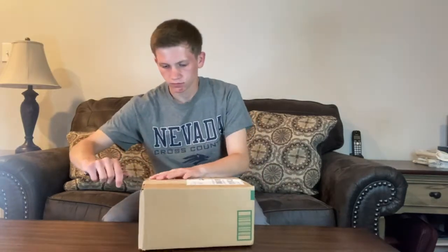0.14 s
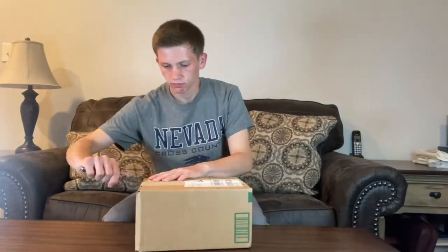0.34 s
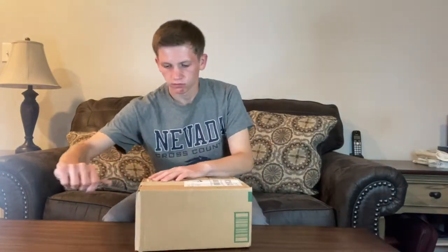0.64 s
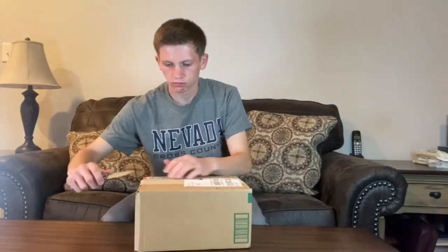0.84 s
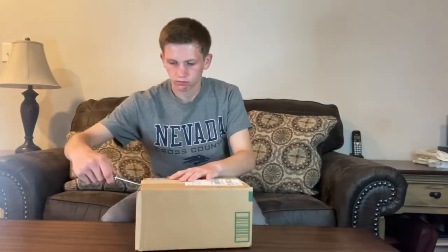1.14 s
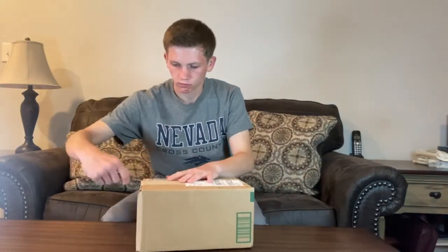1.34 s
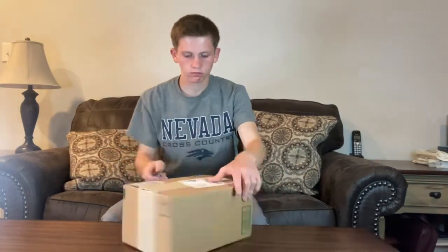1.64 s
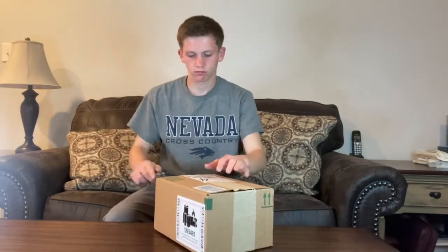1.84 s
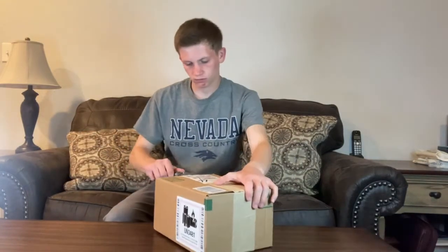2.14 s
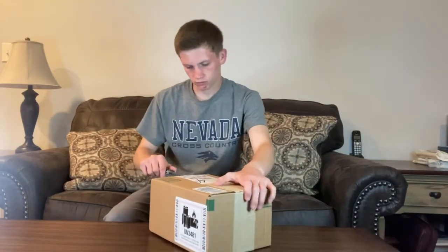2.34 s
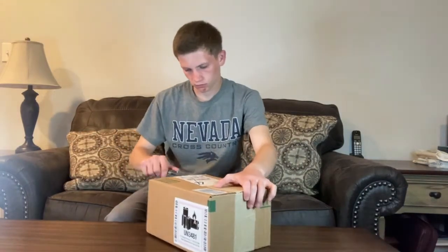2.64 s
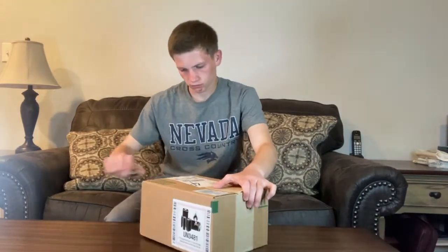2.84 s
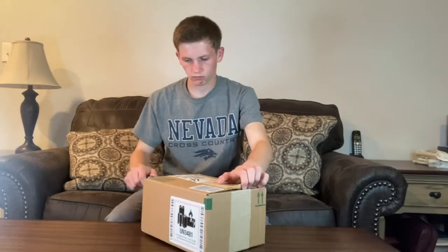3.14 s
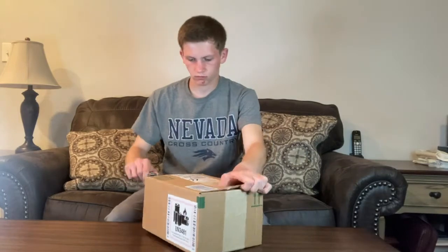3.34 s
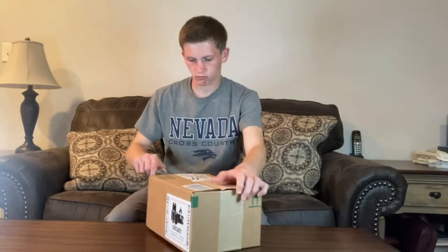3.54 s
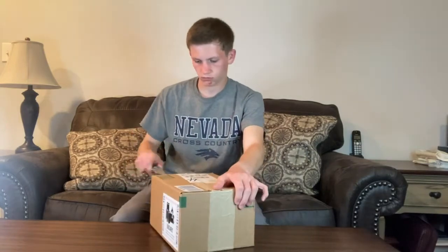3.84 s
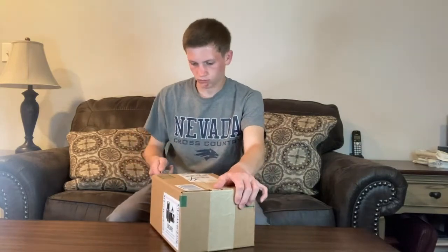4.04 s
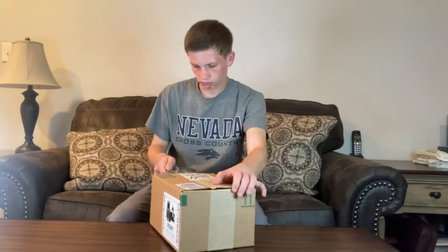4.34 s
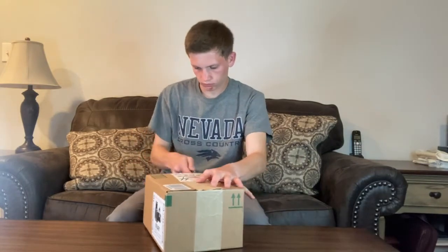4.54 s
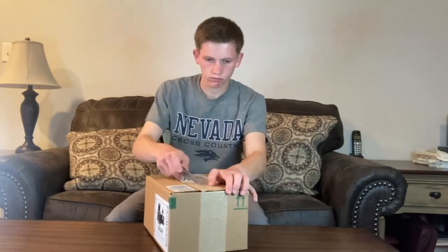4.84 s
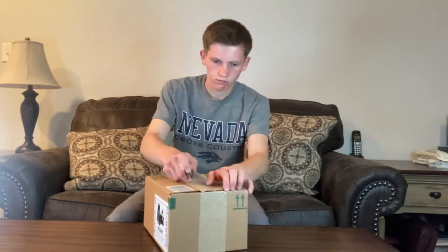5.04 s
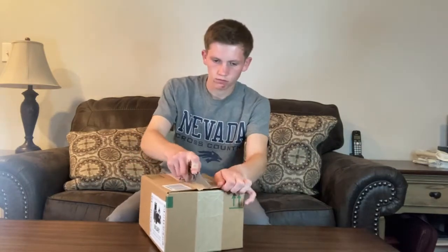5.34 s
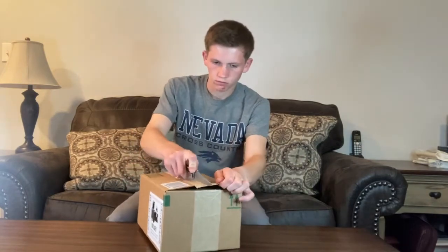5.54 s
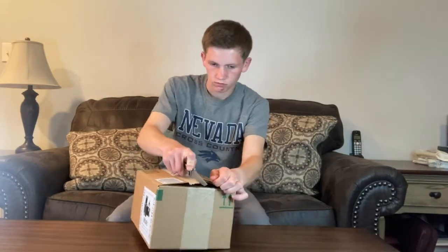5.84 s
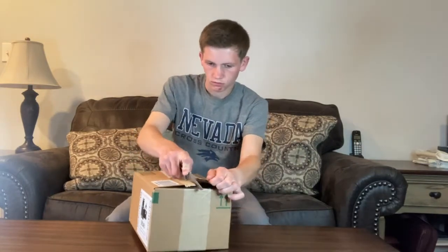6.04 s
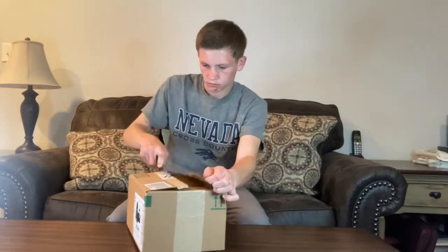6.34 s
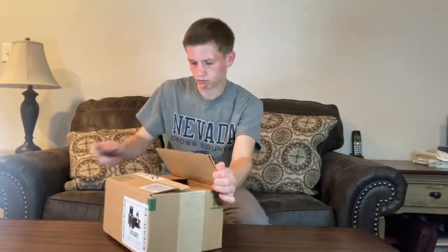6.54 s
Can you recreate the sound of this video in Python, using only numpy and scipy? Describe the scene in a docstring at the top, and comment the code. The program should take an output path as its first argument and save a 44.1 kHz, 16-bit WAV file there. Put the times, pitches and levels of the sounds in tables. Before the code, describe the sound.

Close, dry cardboard rubbing and clicking as packing tape is cut, with boxy knocks, low table thumps and a single bursting pop.

```python
"""Knife through packing tape

A knife slits packing tape on a cardboard box that stands on a wooden table in a furnished room.
Blade and hands rub the board (patchy noise and ticks), the tape lets go in sharp snaps (clicks that ring
the box), the flaps jolt (rough force through box resonances), and the table murmurs and thuds (low noise).
Once the taut end strip bursts with a crack and the table hums; echoes and a faint hush are the room.
Two close microphone ports hear it, the left one a moment earlier."""
import sys
import numpy as np
from scipy import signal
from scipy.fft import rfft, irfft, next_fast_len
from scipy.io import wavfile
from scipy.ndimage import uniform_filter1d, map_coordinates

SR = 44100
rng = np.random.default_rng(int(sys.argv[2]) if len(sys.argv) > 2 else 0)


def put_to_file(sound):
    """Save the sound as 16-bit audio at rate SR, in the file named by the first command-line argument."""
    columns = np.atleast_2d(sound).T  # one column per channel
    safe = np.clip(columns, -1, 1)
    whole_steps = np.round(safe * 32767)
    wavfile.write(sys.argv[1], SR, whole_steps.astype(np.int16))


N = 294928

# Resonances of the cardboard box. Each row: centre in Hz, width in Hz, relative level in dB.
BOX_MODES = [(192, 38, -7.5), (318, 158, 2), (546, 340, 2.5), (778, 305, 3), (1060, 110, 0.5),
             (1340, 247, -5), (2330, 200, -11), (2510, 370, -12)]
# Colour of the hiss at the rubbed surface. Each row: frequency in Hz, relative level in dB per Hz.
HISS_COLOUR = [(880, -35), (1500, -7), (1740, -7.5), (2690, -3.5), (2970, -1.5), (3180, -4.5), (3730, -6),
               (4370, -7), (7610, -12.5), (9010, -12.5), (11500, -17), (15100, -20.5), (16000, -22)]
# Colour of a tick or snap. Each row: frequency in Hz, relative level in dB per Hz.
CRACK_COLOUR = [(700, -30), (1500, -11), (2700, -5), (4000, -6.5), (6000, -4.5), (9500, -5.5), (12000, -17),
                (15000, -8), (16000, -10)]
# How alike rubbing and table sound at the two ports. Each row: frequency in Hz, likeness (1 = same).
PORT_LIKENESS = [(100, 0.97), (1000, 0.85), (4000, 0.17), (12000, 0.2)]


def amp(db):
    """dB to gain."""
    return 10 ** (np.asarray(db) / 20)


def unit(x):
    """Scaled to rms 1."""
    return x / np.sqrt(np.mean(x ** 2) + 1e-20)


def peak_one(x):
    """Each row scaled to peak 1."""
    return x / np.abs(x).max(axis=1, keepdims=True)


def along(points, hz):
    """Reads (Hz, value) points on a logarithmic frequency axis."""
    f, v = np.transpose(points)
    return np.interp(np.log(hz + 1), np.log(f + 1), v)


def curves(rows):
    """One value per sample for each column after the time."""
    s, *cols = np.transpose(rows)
    return [np.interp(np.arange(N) / SR, s, c) for c in cols]


def wobble(rate):
    """A smooth random curve with rate knots a second."""
    knots = rng.standard_normal(int(N * rate / SR) + 4)
    return map_coordinates(knots, [np.arange(N) * rate / SR])


def filtered(x, response):
    """Filters x by a complex response of frequency."""
    n = x.shape[-1]
    m = next_fast_len(n + 8192)  # silence for the ringing to run into
    return irfft(rfft(x, m) * response(np.fft.rfftfreq(m, 1 / SR)), m)[..., :n]


def resonances(modes):
    """Causal response of (Hz, width Hz, dB) modes, added with alternating sign."""
    def response(f):
        total = 0
        for k, (centre, width, db) in enumerate(modes):
            damping = 1j * f * width
            total = total + (-1) ** k * amp(db) * damping / (centre * centre - f * f + damping)
        return total
    return response


def favour(centre_hz, width, rest):
    """One broad resonance of relative width over a flat rest."""
    def response(hz):
        damping = 1j * hz * width * centre_hz
        return rest + damping / (centre_hz ** 2 - hz ** 2 + damping)
    return response


def causal(db_of):
    """Minimum-phase response with the given dB over frequency."""
    def response(f):
        cepstrum = irfft(np.log(amp(db_of(f)) + 1e-6))
        half = len(cepstrum) // 2
        cepstrum[1:half] *= 2  # fold the part before time zero onto the part after
        cepstrum[half + 1:] = 0
        return np.exp(rfft(cepstrum))
    return response


def pair(response, likeness):
    """Stereo noise of rms 1 whose two sides are partly alike."""
    def mid_and_side(hz):
        turn = np.arccos(np.clip(along(likeness, hz), -1, 1)) / 2
        return response(hz) * [np.cos(turn), np.sin(turn)]
    mid, side = filtered(rng.standard_normal((2, N)), mid_and_side)
    return unit(np.array([mid + side, mid - side]))


def patchy(x, depth_db):
    """Random patches of gain over time and frequency: the colour of a rubbed surface keeps shifting."""
    z = signal.stft(x, nperseg=256)[2]
    field = uniform_filter1d(rng.standard_normal(z.shape[1:]), size=4, axis=0)  # over frequency
    field = uniform_filter1d(field, size=9, axis=1)  # over time
    return unit(signal.istft(z * amp(depth_db * unit(field)), nperseg=256)[1][:, :N])


def summed(db, rest_db, t):
    """Rows of dB at times t, added by power over a resting level, as one gain per sample."""
    gain = np.sqrt((amp(db) ** 2).sum(axis=0) + amp(rest_db) ** 2)
    return np.interp(np.arange(N) / SR, t, gain)


def place(bursts, times):
    """Adds each burst into one track at its time."""
    track = np.zeros(N + bursts.shape[1])
    for s, burst in zip(times, bursts):
        track[round(s * SR):][:len(burst)] += burst
    return track[:N]


def strokes():
    """Gains of board, dull and bright hiss: a stroke sets in, swells or sinks, and dies away."""
    # Strokes of blade, hands and box. Each row: start in seconds, length in seconds, board level in dB,
    # surface hiss level in dB, swell from start to end in dB, bright over dull hiss in dB.
    stroke_rows = [(0, 0.011, -60.5, -67.5, -1.5, -1), (0.03, 0.068, -56, -68, -1.5, 2.5),
                   (0.123, .025, -57, -61, 1, -4), (0.193, 0.17, -55.5, -58.5, 5, 0),
                   (0.362, 0.062, -56, -61, -20.5, 19.5), (0.455, 0.021, -54, -47, -4, 1),
                   (0.568, .04, -46, -48, 16, -7), (0.609, 0.017, -48, -47, -9, 7),
                   (0.657, 0.038, -49.5, -55, 9.5, -2), (0.761, 0.096, -64, -72, 9, -1),
                   (1.05, 0.045, -52.5, -56, -17.5, -4.5), (1.101, 0.081, -58.5, -76, -8, -11),
                   (1.212, 0.048, -54.5, -69, 8.5, -7), (1.291, 0.068, -46, -51.5, -3.5, 1.5),
                   (1.339, 0.1262, -54, -60.5, 9, -1.5), (1.504, 0.053, -64.5, -71, 10.5, 7.5),
                   (1.605, 0.1, -55, -50, 4, 4), (1.739, .1, -54.5, -56.5, -2.5, 1),
                   (2.013, 0.024, -53, -68.5, -13, 7), (2.06, 0.075, -84, -89, -7, 11),
                   (2.17, 0.12, -71.5, -71, 12, 6.5), (2.32, 0.036, -55, -65, 8.5, 1),
                   (2.467, 0.088, -64.5, -85, 0.5, -27), (2.565, 0.073, -50.5, -59, -0.5, 3),
                   (2.668, 0.053, -48, -50, 0, -4), (2.743, .04, -53, -61.5, 5, -3.5),
                   (2.841, 0.024, -40, -40, 8, -6), (2.872, 0.053, -46, -53, -17, 1.5),
                   (2.959, .12, -57.5, -56.5, 5, 1), (3.129, .11, -60.5, -65.5, 4.5, -4.5),
                   (3.247, 0.11, -53.5, -59, -2.5, -1), (3.35, .07, -54.5, -53, 7.5, 3),
                   (3.431, .1, -52, -45.5, -14, -5.5), (3.537, .05, -55, -55.5, -1.5, -1),
                   (3.593, 0.027, -51.5, -52, 2, 1.5), (3.642, 0.098, -57, -58.5, -14, -1.5),
                   (3.758, 0.087, -57, -60.5, 1, 3), (3.955, 0.015, -80.5, -77.5, -2, 3.5),
                   (4.072, 0.23, -77.5, -101.5, 15, 2.5), (4.322, 0.037, -66.5, -61.5, -10, -3),
                   (4.356, 0.069, -56, -51.5, 5, 5.5), (4.456, 0.036, -40.5, -48, 9.5, -7),
                   (4.498, 0.091, -52.5, -54.5, -5.5, -3.5), (4.621, 0.051, -40, -50, 14, -8.5),
                   (4.669, 0.07, -72.5, -62, -11, -7.5), (4.801, .13, -64, -71.5, 5, 6.5),
                   (4.966, .09, -63.5, -64.5, -3, -3), (5.092, 0.11, -60.5, -62, -12, 0.5),
                   (5.205, 0.18, -59.5, -66, -16, 2.5), (5.459, 0.041, -65, -65, 11.5, -2.5),
                   (5.595, 0.019, -74, -72.5, 1, -9), (5.719, 0.058, -70.5, -69, 9, 2),
                   (5.628, 0.034, -82, -75, -5, -4), (5.78, 0.051, -73.5, -70.5, -6, -4),
                   (5.858, 0.22, -72.5, -72.5, -7, -3.5), (6.037, .05, -55, -57.5, -11, 8),
                   (6.111, 0.085, -60.5, -59.5, -7, -4), (6.224, 0.11, -58, -64.5, 8, -4),
                   (6.365, 0.079, -53.5, -61, -7.5, -6), (6.496, 0.084, -79.5, -79, -8, 4.5)]
    attack_db_per_s, release_db_per_s = 1299, 298.5
    rest_board_db, rest_dull_db, rest_bright_db = -87, -88.5, -88  # hands lying still on the box
    s, length, board_db, hiss_db, swell_db, bright_db = np.transpose(stroke_rows)[..., None]
    t = np.arange(0, N / SR, .001)
    shape_db = swell_db * (np.clip((t - s) / length, 0, 1) - .5)
    shape_db -= attack_db_per_s * np.maximum(s - t, 0)
    shape_db -= release_db_per_s * np.maximum(t - s - length, 0)
    board = summed(board_db + shape_db, rest_board_db, t)
    dull = summed(hiss_db - bright_db / 2 + shape_db, rest_dull_db, t)
    bright = summed(hiss_db + bright_db / 2 + shape_db, rest_bright_db, t)
    return board, dull, bright


def fibres(rate, spread_db):
    """Single fibres break at random: sparse impulses, rate a second, of very unequal size, rms 1."""
    chance, size = rng.random(N), rng.exponential(size=N)
    sign = rng.choice([-1, 1], N)
    return unit((chance < rate / SR) * amp(spread_db * np.minimum(size, 4)) * sign)


def rubbing():
    """Uneven friction: fibres catch in clumps, hiss at the surface and shake the box."""
    pressure, dull, bright = strokes()
    grip = wobble(35)
    catches = unit(amp(1.3 * grip + 0.32 * wobble(250)))
    shaken = patchy(pair(resonances(BOX_MODES), PORT_LIKENESS), depth_db=4)
    board = pressure * amp(0.59 * grip) * shaken
    breaks = fibres(600, spread_db=4.0)  # each tick at the surface also taps the box
    ticks = amp(-7.5) * unit(filtered(breaks, causal(lambda hz: along(CRACK_COLOUR, hz))))
    friction = patchy(pair(lambda hz: amp(along(HISS_COLOUR, hz)), PORT_LIKENESS), depth_db=3)
    surface = catches * friction + ticks
    rasp = filtered(surface, lambda hz: 1 / (1 + (hz / 5200) ** 4))  # the dull part
    hiss = dull * rasp + bright * (surface - rasp)
    taps = pressure * amp(-7.5) * unit(filtered(breaks, resonances(BOX_MODES)))
    return board + hiss + taps


def table_top():
    """The table murmurs under the handling and booms briefly at each bump: noise through its modes."""
    # Resonances of the table top. Each row: centre in Hz, width in Hz, relative level in dB.
    table_modes = [(113, 18, -2.5), (178, 60, -10)]
    # The box bumps the table top. Each row: time in seconds, level in dB before the wobble.
    thud_rows = [(.17, -67), (.345, -50), (.455, -58), (0.602, -48), (.68, -53), (1.05, -58), (1.298, -44),
                 (1.39, -58), (1.46, -45.5), (1.581, -41.5), (1.845, -55), (2.005, -46), (2.36, -61),
                 (2.585, -65), (2.68, -51), (2.8, -55), (2.86, -48), (2.95, -69.5), (3.599, -48.5),
                 (4.49, -51), (4.66, -49), (4.87, -61), (5.154, -54.5)]
    # The low murmur. Each row: time in seconds, level in dB before the wobble.
    murmur_rows = [(0, -63), (1, -71), (1.5, -68), (2.15, -69), (3.3, -64.5), (3.95, -66.5), (4.1, -67.5),
                   (4.4, -68), (5.05, -71), (5.38, -60.5), (5.56, -87), (5.87, -82.5), (5.94, -72),
                   (6.01, -81), (6.06, -72), (6.4, -65.5), (6.62, -87)]
    rise_s, fall_s = 0.0105, 0.45  # each over 60 dB
    s, db = np.transpose(thud_rows)[..., None]
    t = np.arange(0, N / SR, .001)
    bumps = summed(db - 60 * np.maximum((s - t) / rise_s, (t - s) / fall_s), -120, t)
    level = np.hypot(bumps, amp(curves(murmur_rows)[0]))
    return level * amp(3.2 * wobble(26)) * pair(resonances(table_modes), PORT_LIKENESS)


def room_tone():
    """A faint steady hush, coloured noise that sinks towards the end."""
    # Colour of the hush. Each row: frequency in Hz, relative level in dB per Hz.
    air_colour = [(18, -49), (30, -34), (112, 1), (336, -3), (962, -6.5), (1960, -15), (2980, -25),
                  (8520, -22), (12000, -28), (13500, -41.5), (16000, -44.5)]
    # Level of the hush. Each row: time in seconds, level in dB.
    air_level = [(0, -76), (5.3, -80), (6.4, -86), (6.69, -88)]
    hush = pair(lambda hz: amp(along(air_colour, hz)), [(100, 0.42), (3000, .4)])
    return amp(curves(air_level)[0]) * hush


def room(x):
    """Each frequency of the room's answer dies at its own speed; every stretch of sound meets a new tail."""
    # Decay of the room. Each row: frequency in Hz, time to fall by 60 dB in seconds.
    decay_rows = [(150, 0.17), (800, 0.2), (3000, 0.094), (12000, 0.15)]
    # How alike the echoes are at the two ports. Each row: frequency in Hz, likeness (1 = same).
    echo_likeness = [(100, 0.83), (1000, 0.11), (4000, 0.45), (12000, 0.1)]
    step = SR // 4
    delay = 130  # samples until the first echo
    wet = np.zeros((2, N + SR + step))
    for start in range(0, N, step):
        hz, t, (mid, side) = signal.stft(rng.standard_normal((2, SR // 3)), SR, nperseg=256)
        turn = np.arccos(np.clip(along(echo_likeness, hz), -1, 1))[:, None] / 2
        z = np.cos(turn) * mid + np.array([[[1]], [[-1]]]) * np.sin(turn) * side
        decay = amp(-60 * t / along(decay_rows, hz)[:, None])
        tail = signal.istft(z * decay, SR, nperseg=256)[1]
        tail = tail / np.linalg.norm(tail[0])
        echo = signal.fftconvolve(x[None, start:start + step], tail, axes=1)
        wet[:, start + delay:][:, :echo.shape[1]] += echo
    return wet[:, :N]


def snaps():
    """The glue starts to crackle and lets go a moment later: a click, and a push that rings the box."""
    # Tape snaps and blade ticks. Each row: start in seconds, peak of the click in dB, push on the board
    # in dB against the click, favoured pitch in Hz, tilt in dB per octave of (Hz + 1000), held within 20.
    snap_rows = [(.087, -50, -5, 2700, -5), (0.2979, -34.5, -19, 2710, -5), (0.3402, -35.5, -3, 2500, -10),
                 (0.4482, -40, 0, 2560, -8), (0.4689, -29.5, -15.5, 2540, -18),
                 (0.5712, -35, -11, 2470, -11), (0.5927, -27.5, -12, 2470, -12),
                 (0.6426, -35, -10.5, 2700, -21), (0.6816, -25.5, -1, 3600, -9), (1.035, -39, -4, 2480, 2),
                 (1.1291, -40.5, 0, 2380, -26), (1.2944, -35, -7, 2740, -15), (1.527, -42, -7, 3900, -0.5),
                 (1.5738, -47, 1, 2900, -8), (1.711, -30, 2, 3050, -7), (1.843, -27, -14, 3030, 3.5),
                 (1.858, -43.5, -18, 7950, 5), (1.9981, -44, 4, 2920, -1), (2.0585, -55, 13, 3030, -14),
                 (2.178, -52, -26, 8000, 3), (2.3588, -38, -16, 3300, -22), (2.371, -47.5, -20, 8000, 1),
                 (2.465, -51.5, 7.5, 3070, -25), (2.556, -52, -20, 7940, 1), (2.5919, -39.5, -6, 2580, -23),
                 (2.7767, -31.5, -17.5, 2800, 7.5), (3.028, -32, -28, 3010, 3.5),
                 (3.1108, -36, 5, 2370, -12), (3.163, -31.5, -6.5, 3064, 5), (3.3543, -40, -3.5, 3020, -4),
                 (3.3999, -20.5, -22.5, 6690, -3.5), (3.417, -49, -15.5, 2560, -5.5),
                 (3.4259, -33, -1.5, 3450.0, 0), (3.5559, -42, -11.5, 8540, 2),
                 (3.754, -37, -23, 8020, -11.5), (3.9352, -58.5, -3.5, 7290, 5),
                 (3.9669, -38, -24.5, 7830, -5.5), (4.02, -67.5, 17.5, 2910, -1),
                 (4.448, -38, -22, 3150, -7), (4.6604, -24.5, 1, 3240, -6.5), (4.824, -52, -16.5, 9500, -1),
                 (4.8658, -54, 16.5, 2020.0, 12), (4.9761, -43, -1, 2430, -1.5),
                 (4.9888, -40.5, -18, 6100, 7.5), (5.0886, -41, -27, 6720.0, 11),
                 (5.1522, -42.5, 13, 2930, -26), (5.223, -42.5, -19, 6800, -4),
                 (5.3046, -48.5, -1, 2650, -23), (5.3498, -45.5, -21, 4020, 3),
                 (5.466, -53.5, -20, 8020, -2), (5.49, -52, -19, 7500, 2), (5.6012, -48, -18, 7550, -0.5),
                 (5.689, -64.5, -3, 4010, -7), (5.7568, -39, -28, 3750, -0.5), (5.9158, -46.5, -3, 6640, 1),
                 (5.9633, -50, -7, 3830, 3), (6.0177, -45.5, 1, 3720, 0), (6.0443, -32, -8, 3640, 2.5),
                 (6.1095, -34.5, -29, 2380, 1), (6.255, -48, -16, 2330, -18), (6.3813, -37.5, 3, 3300, 2.5)]
    s, db, push_db, spot_hz, tilt_db = np.transpose(snap_rows)[..., None]
    t = np.arange(SR // 10) / SR
    release = np.arange(len(t)) == round(.0012 * SR)
    crackle = release + 0.19 * rng.standard_normal((len(s), len(t))) * amp(-60 * t / 0.029)
    colour = causal(lambda hz: along(CRACK_COLOUR, hz))
    spot, broad = favour(spot_hz, .07, 0.74), favour(spot_hz, .6, 0.46)
    lean = lambda hz: amp(np.clip(tilt_db, -20, 20) * np.log2((hz + 1000) / 5000))
    click = peak_one(filtered(crackle, lambda hz: colour(hz) * spot(hz) * broad(hz) * lean(hz)))
    box = resonances(BOX_MODES)
    push = peak_one(filtered(1. * release, lambda hz: box(hz) / (1 + 1j * hz / 1200))[None])
    return place(amp(db) * (click + amp(push_db) * push), s[:, 0])


def jolts():
    """A short rough force swells and dies in the board; each spot favours the box modes near its own pitch."""
    # The blade slips or a flap gives. Each row: start in seconds, peak of the board in dB, favoured
    # pitch in Hz, hiss in dB against the board, time for the force to fall by 60 dB in seconds.
    jolt_rows = [(0.18, -44.5, 390, -10, 0.058), (0.239, -45, 400, -15, 0.048), (.284, -44, 800, 2, 0.095),
                 (.341, -35, 354, -24, 0.045), (0.36, -34.5, 320, -7, 0.03), (.451, -24, 360, -8, 0.095),
                 (0.467, -26.5, 373, -15.5, 0.04), (0.568, -34.5, 270, -29, 0.021),
                 (0.592, -31, 362, -6, 0.097), (.61, -29, 330, -9, 0.056), (.621, -25, 330, -28, 0.015),
                 (.678, -29.5, 624, -2, 0.047), (.859, -49, 554, 8, 0.051), (1.038, -40, 664, -2, 0.11),
                 (1.056, -30, 526, -15, 0.029), (1.213, -48, 1570, -18, 0.053),
                 (1.296, -29.5, 950, 0, 0.062), (1.302, -31.5, 318, -23, 0.023),
                 (1.313, -29.5, 920, -22.5, 0.027), (1.317, -28.5, 308, -22.5, .03),
                 (1.328, -30.5, 312, -35, .04), (1.35, -32.5, 960, -22, 0.032),
                 (1.352, -29.5, 247, -25, 0.064), (1.39, -41, 225, -20, 0.064),
                 (1.445, -38.5, 1010, -9, 0.077), (1.528, -40, 790, 0, 0.033), (1.564, -43, 700, -15, 0.03),
                 (1.576, -34, 305, -11, 0.036), (1.6, -40.5, 205, 3.5, 0.024), (1.712, -28, 790, -26, 0.07),
                 (1.794, -38, 590, -7, 0.12), (1.838, -42, 700, 12.5, 0.045),
                 (2.005, -28.5, 323, -24, 0.028), (2.013, -43.5, 1060, -25, 0.026),
                 (2.022, -47, 198, -35, .1), (2.308, -43.5, 680, 4, 0.084), (2.357, -38.5, 710, -26, 0.013),
                 (2.466, -44.5, 363, -42, 0.077), (2.584, -40.5, 380, -12.5, 0.1),
                 (2.63, -48, 700, -20, 0.052), (2.662, -40, 780, -10, 0.044), (2.698, -33, 332, -15, .04),
                 (2.716, -34, 333, -20, .04), (2.729, -32, 780, -34, 0.019),
                 (2.754, -27.5, 766, -27.5, 0.021), (2.835, -34.5, 800, -17, 0.073),
                 (2.8531, -19, 303, -12, 0.031), (2.8577, -23.5, 298, -20, 0.046),
                 (2.868, -26, 830, -8.5, .07), (2.89, -26.5, 1050, 6, .02), (3.111, -30.5, 466, -36, 0.031),
                 (3.114, -32.5, 1060, -25, 0.045), (3.248, -40, 676, -13.5, 0.059),
                 (3.4299, -21, 1340, -3.5, 0.029), (3.434, -20, 667, -12, .09),
                 (3.446, -29.5, 1450, -9, 0.038), (3.47, -30.5, 713, -16.5, .14),
                 (3.594, -44.5, 263, -15, 0.066), (3.868, -41.5, 1030, -19.5, 0.021),
                 (4.02, -42, 303, -35, 0.033), (4.08, -54, 389, -32, 0.014), (4.151, -53, 383, -30, 0.018),
                 (4.222, -51.5, 370.6, -29.5, 0.044), (4.357, -54, 797, 5.5, 0.056),
                 (4.484, -31, 550, -13.5, 0.058), (4.495, -23, 810, -31, 0.05), (4.504, -19, 900, -30, .06),
                 (4.51, -19.5, 357, -32, 0.09), (4.542, -32.5, 394, -35, .14),
                 (4.636, -32.5, 1340, -11, 0.12), (4.66, -13.5, 850, -27.5, 0.028),
                 (4.664, -30.5, 232, -32.5, 0.038), (4.674, -25.5, 900, -27, 0.05),
                 (4.684, -28.5, 805, -30, .1), (4.827, -42.5, 527, -14.5, 0.07),
                 (4.865, -43, 656, -11.5, 0.096), (4.945, -43, 670, -24, 0.073),
                 (5.15, -30.5, 358, -32.5, 0.048), (5.162, -39, 560, -23, 0.073),
                 (5.208, -36, 590, -22, 0.06), (5.466, -57, 1000, -3.5, 0.057), (5.914, -50, 821, 5, 0.021),
                 (6.037, -40, 657, 16, 0.046), (6.11, -44, 1060, 11.5, 0.048),
                 (6.349, -39.5, 760, -10, 0.088), (6.379, -49, 317, -7, 0.043),
                 (6.494, -50, 744, -16.5, 0.036)]
    s, db, spot_hz, hiss_db, t60 = np.transpose(jolt_rows)[..., None]
    rise_s = 0.0012 + .045 * t60  # a longer jolt swells more slowly
    t = np.arange(SR // 4) / SR
    swell = (1 - np.exp(-t / rise_s)) * amp(-60 * t / t60)
    knock = 6.5 * (np.arange(len(t)) == np.round(rise_s * SR / 2))  # a single blow at the head
    force = knock + swell * rng.standard_normal((len(s), len(t)))
    box, spot = resonances(BOX_MODES), favour(spot_hz, .16, .19)
    board = peak_one(filtered(force, lambda hz: box(hz) * spot(hz) / (1 + 1j * hz / (3 * spot_hz))))
    surface = peak_one(filtered(force, lambda hz: amp(along(HISS_COLOUR, hz))))
    return place(amp(db) * (board + amp(hiss_db) * surface), s[:, 0])


def pop():
    """The taut end strip bursts: one blow rings as a crack; apart from it, the table's low sine hum."""
    # What rings in the burst. Each row: centre in Hz, width in Hz, relative level in dB.
    burst_modes = [(715, 90, 2), (1340, 260, 0.5), (1700, 140, -1), (2240, 300, 0), (4040, 110, -25),
                   (5920, 180, -6.5), (10510, 1100, -17.5), (15300, 2200, -25)]
    start_s, peak_db = 3.4313, 0
    hum_hz, hum_db, rise_s = 117, -37, .012
    hold_s, damped_db_per_s = .11, 500  # the table hums until a hand damps it
    blow = 1. * (np.arange(SR // 2) == 0)[None]
    crack = peak_one(filtered(blow, resonances(burst_modes)))
    t = np.arange(SR // 2) / SR
    fade_db = -40 * t - damped_db_per_s * np.maximum(t - hold_s, 0)
    swell = np.minimum(t / rise_s, 1) ** 2
    hum = swell * amp(hum_db + fade_db) * np.sin(2 * np.pi * hum_hz * t)
    return place(amp(peak_db) * crack, [start_s]), place(hum[None], [start_s])


def scene():
    """All sources, with the room's answer to all but the hum and the hush."""
    crack, hum = pop()
    hits = snaps() + crack + jolts()
    rub = rubbing() + table_top()
    echoes = room(amp(-8) * hits + amp(-9.5) * rub.mean(axis=0))
    return hits + hum + rub + echoes + room_tone()


def record(dry):
    """The ports differ in colour and phase, the deep bass is cut, peaks are rounded off, the band is limited."""
    # Colour of the ports. Each row: frequency in Hz, left minus right in dB.
    port_colour = [(60, 1.5), (180, -4), (550, -2), (1650, 1.5), (5000, 1), (15000, 0.5)]
    # Phase between the ports. Each row: frequency in Hz, lead of the left port in radians.
    left_lead = [(60, 0), (1000, .45), (2500, .4), (5400, 1.4), (8400, 1.3), (11000, 2.4), (14000, 1.8),
                 (15500, .4)]
    bass_cut_hz, top_hz = 55, 16000
    full_scale = .9  # the input stage rounds off peaks near this value
    half = np.array([[.5], [-.5]])  # each port takes half of the difference
    ports = lambda hz: amp(half * along(port_colour, hz)) * np.exp(1j * half * along(left_lead, hz))
    bass_cut = lambda hz: (1j * hz / (bass_cut_hz + 1j * hz)) ** 3
    heard = filtered(dry, lambda hz: ports(hz) * bass_cut(hz))
    rounded = heard / (1 + (heard / full_scale) ** 4) ** (1 / 4)
    return filtered(rounded, lambda hz: hz < top_hz)


dry = scene()
out = record(dry)
put_to_file(out)
```